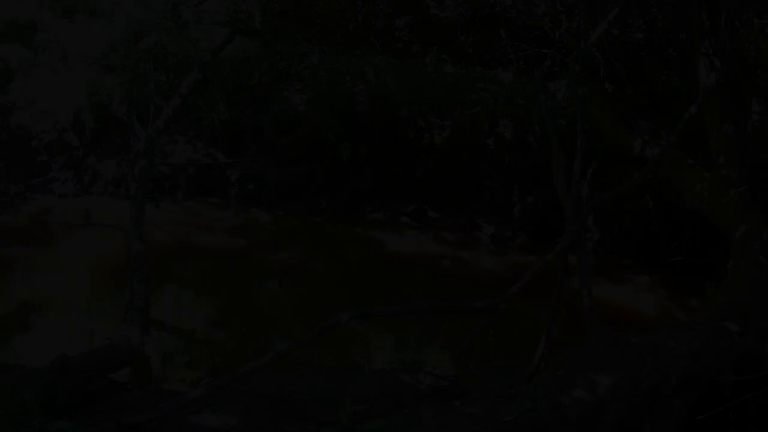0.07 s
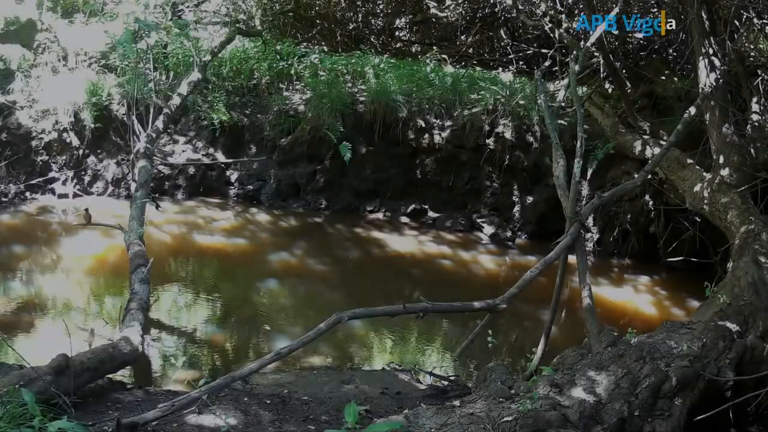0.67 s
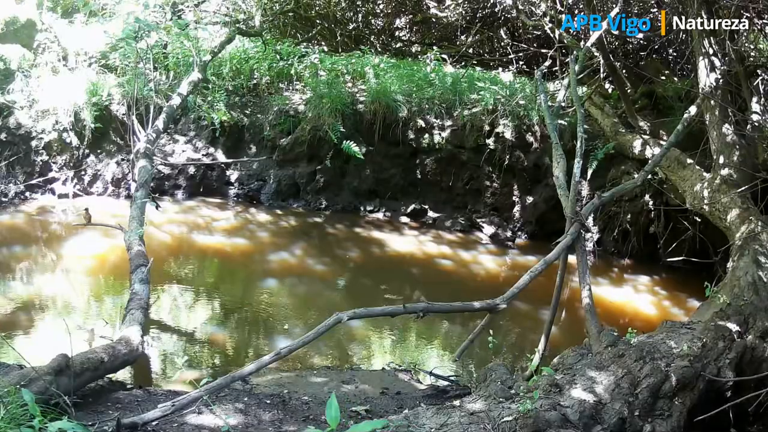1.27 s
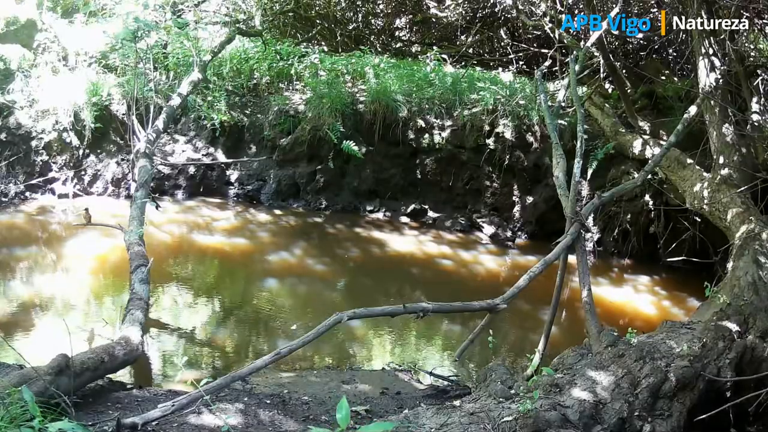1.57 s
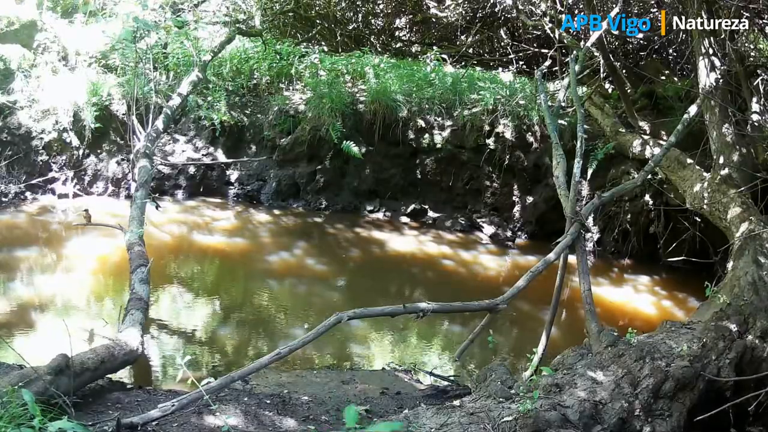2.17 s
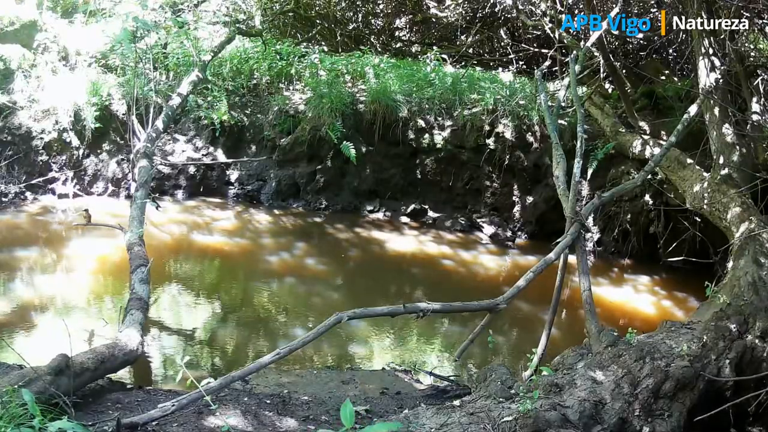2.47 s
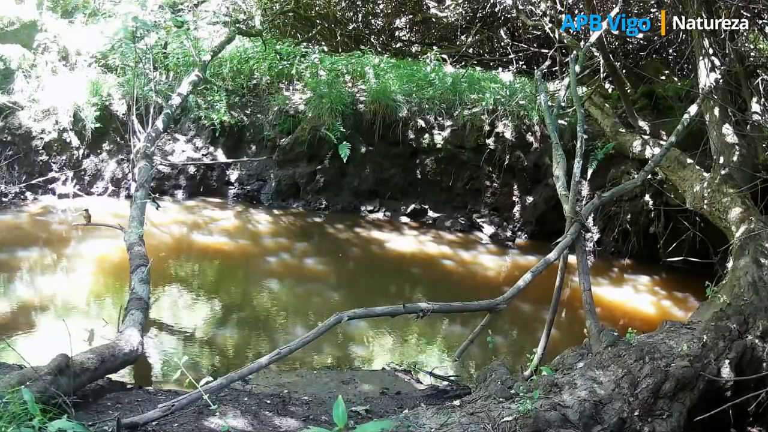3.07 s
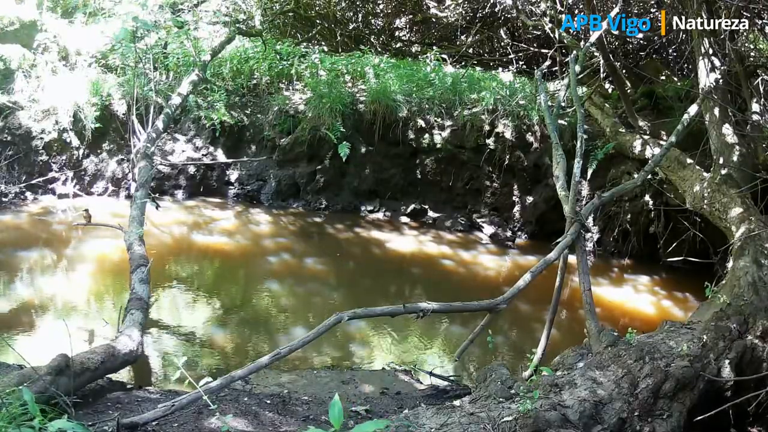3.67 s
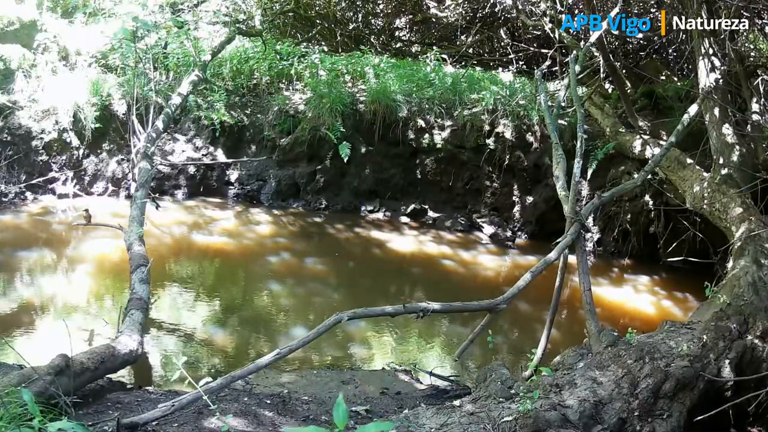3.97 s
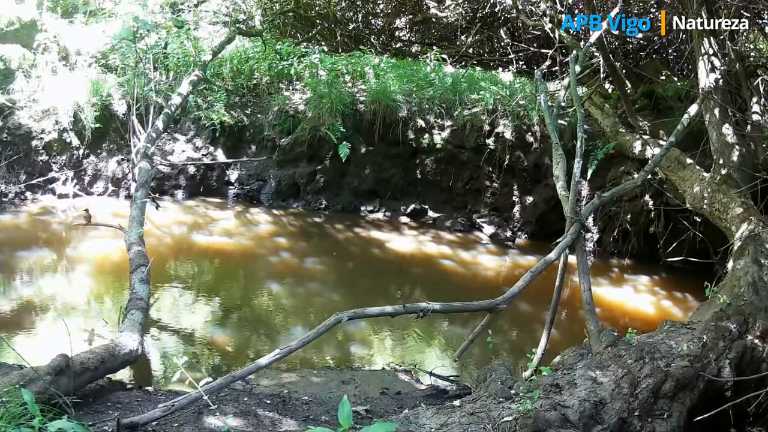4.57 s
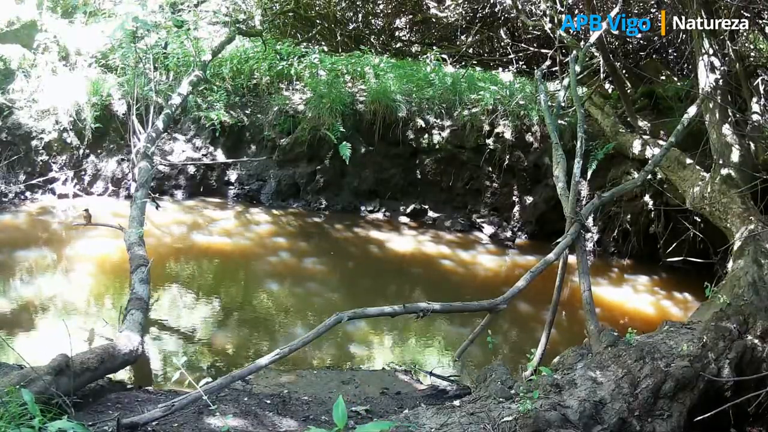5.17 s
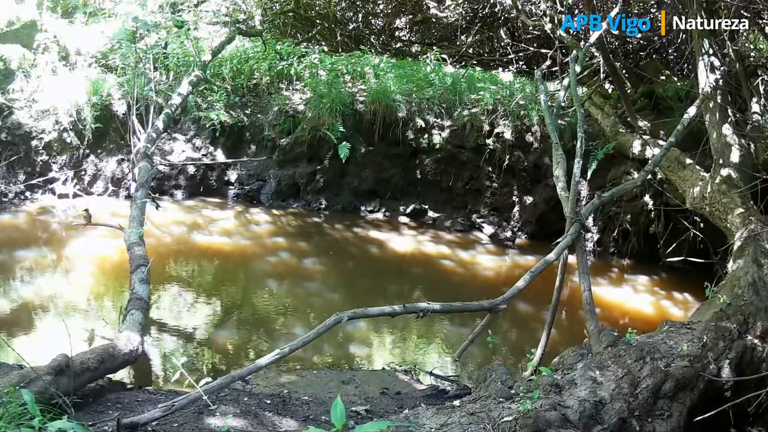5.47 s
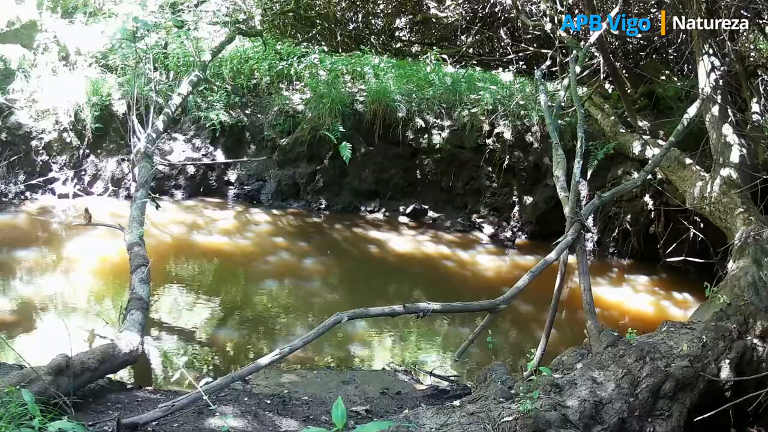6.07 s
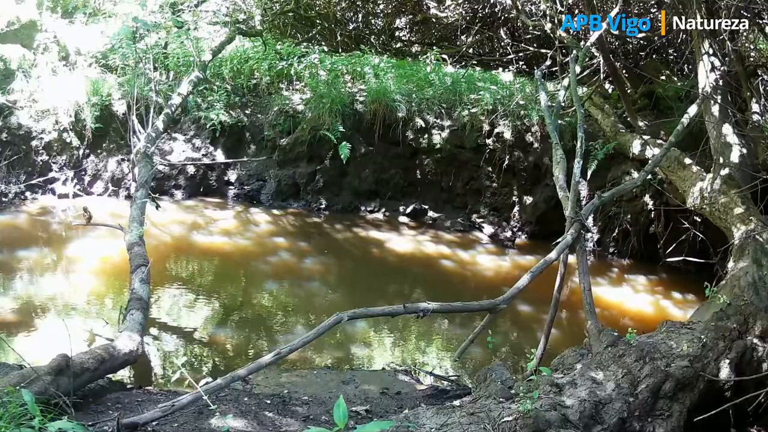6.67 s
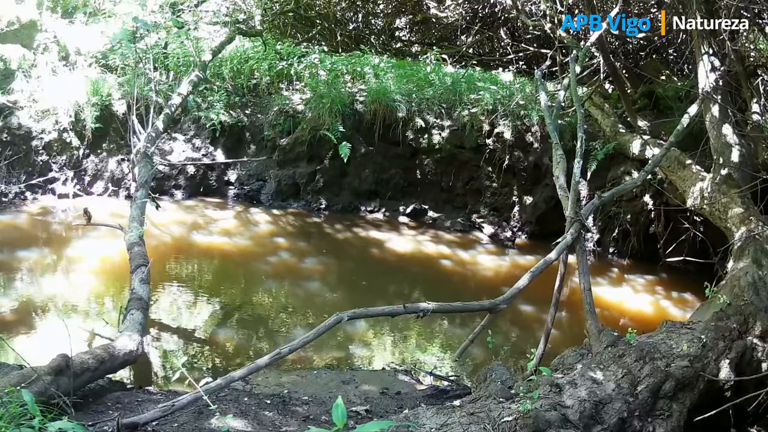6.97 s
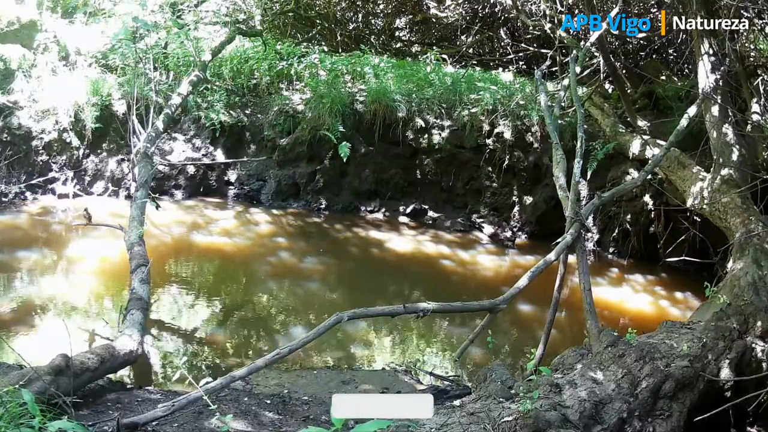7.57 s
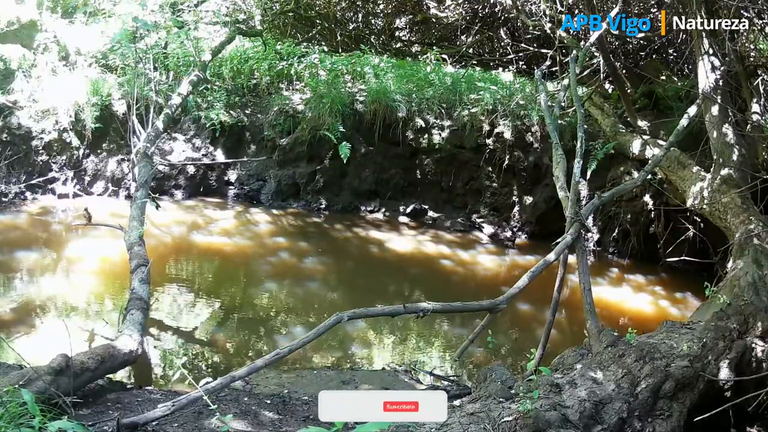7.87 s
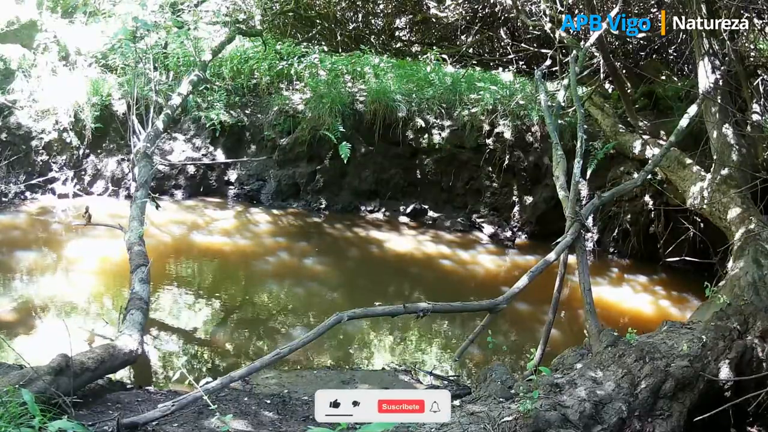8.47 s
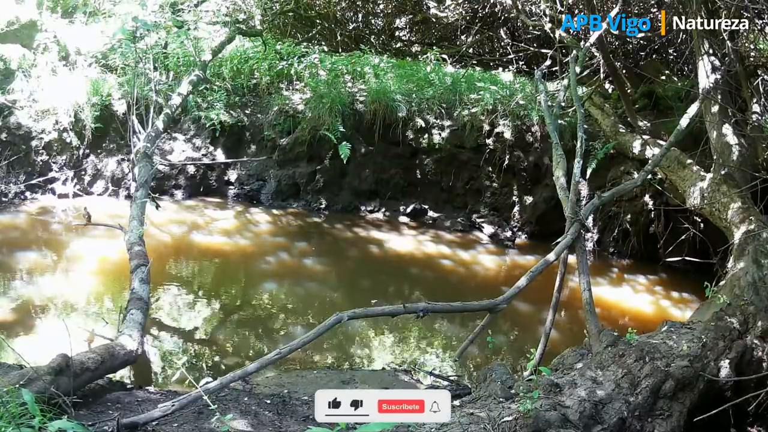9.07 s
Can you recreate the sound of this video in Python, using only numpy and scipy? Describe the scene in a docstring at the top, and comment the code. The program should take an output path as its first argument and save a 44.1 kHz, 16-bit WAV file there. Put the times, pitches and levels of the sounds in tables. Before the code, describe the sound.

Wind rumbles and puffs against the microphone while birds chirp and warble beside a quiet woodland stream.

```python
"""Four sharp bird chips, another bird's yelp and two phrases of a far warbler, by a slow stream.
The calls are gliding syrinx tones, scattered by banks and trees. Water and leaves hush, far
machinery hums, a twig ticks; moving air rumbles and its eddies buffet the microphone.
The sound fades in, on the left channel only."""
import sys
import numpy as np
from scipy import signal
from scipy.fft import rfft, irfft, next_fast_len
from scipy.io import wavfile
from scipy.ndimage import map_coordinates

SR = 44100
rng = np.random.default_rng(int(sys.argv[2]) if len(sys.argv) > 2 else 0)


def wav_record(signal):
    """Record a signal, one row per channel, as 16-bit PCM in the file named by sys.argv[1]."""
    frames = np.transpose(np.atleast_2d(signal))
    bounded = np.clip(frames, -1, 1)
    # unit amplitude maps onto the largest positive 16-bit level
    quanta = np.round(bounded * 32767).astype(np.int16)
    wavfile.write(sys.argv[1], SR, quanta)


N = 410571
TIME = np.arange(N) / SR


def amp(db):
    return 10 ** (np.asarray(db) / 20)


def unit(x):
    return x / np.sqrt(np.mean(x ** 2) + 1e-20)


def wobble(rate_hz, size=N):
    """Smooth random curve through rate_hz knots a second."""
    knots = rng.standard_normal(int(size * rate_hz / SR) + 4)
    return map_coordinates(knots, [np.arange(size) * rate_hz / SR])


def filtered(x, response):
    """Zero-phase filter with gain response(hz)."""
    size = next_fast_len(len(x) + 8192)
    return irfft(rfft(x, size) * response(np.fft.rfftfreq(size, 1 / SR)), size)[:len(x)]


def noise(spectrum):
    """Noise of rms 1, shaped by rows of (frequency [Hz], level [dB])."""
    knots_hz, db = np.transpose(spectrum)
    gain = lambda hz: amp(np.interp(np.log(hz + 1), np.log(knots_hz), db))
    return unit(filtered(rng.standard_normal(N), gain))


def rasp(size, low_hz, high_hz):
    """Band noise of rms 1."""
    band = lambda hz: 1 / (1 + (low_hz / (hz + 1)) ** 8 + (hz / high_hz) ** 12)
    return unit(filtered(rng.standard_normal(size), band))


def add(track, start_s, x):
    part = track[max(0, round(start_s * SR)):][:len(x)]
    part += x[:len(part)]


def voice(hz, harmonics_db=(0,)):
    """Harmonic tone along a pitch curve."""
    phase = 2 * np.pi * np.cumsum(hz) / SR
    return np.sqrt(2) * sum(amp(db) * np.sin(k * phase) for k, db in enumerate(harmonics_db, 1))


def woods(x, t60_s, late_db, late_t60_s):
    """Scatter from banks and trunks: a quick dense answer and a weak long tail."""
    t = np.arange(SR) / SR
    decay = amp(-60 * t / t60_s) + amp(late_db - 60 * t / late_t60_s)
    onset = 1 - np.exp(-t / 0.013)
    tail = rng.standard_normal(SR) * decay * onset
    return signal.fftconvolve(x, tail / np.linalg.norm(tail))


def chips():
    """Small bird: fast pitch arches, second harmonic dominant, over a lower, rougher second voice."""
    # (time [s], level [dB], top pitch [Hz], length [s], arch depth [share of top pitch],
    #  bank echo delay [s], wood scatter [dB], third harmonic [dB], rasp [dB])
    calls = [(1.387, -42.8, 2500, .044, .47, .027, -0.5, -10.5, -6),
             (2.749, -43, 2520, .044, .41, .041, 0.5, -12.5, -7.5),
             (3.950, -53.3, 2580, .045, .38, .018, 6, -12, -7.5),
             (4.618, -53.3, 2510, .04, .31, .033, 6.5, -18, -11)]
    # arch of one chip: (position [share of length], pitch drop [share of depth], level [dB])
    contour = [(0, 1, -11), (.15, .58, -1), (.3, .14, -1), (.5, 0, -1.3), (.7, .11, -.5), (.85, .52, -1.5),
               (1, .95, -9)]
    position, drop, contour_db = np.transpose(contour)
    out = np.zeros(N)
    for start_s, db, top_hz, length_s, depth, echo_s, scatter_db, third_db, rasp_db in calls:
        size = int(length_s * SR)
        progress = np.linspace(0, 1, size)
        arch = 1 - depth * np.interp(progress, position, drop)
        jitter = 0.003 + 0.061 * (1 - arch)  # steady on top, ragged on the flanks
        hz = top_hz * arch * (1 + jitter * wobble(900, size))
        lower_hz = 0.83 * top_hz * arch ** 0.75 * (1 + 0.06 * wobble(900, size))
        tone = voice(hz, [-11, 0]) + amp(-5.5) * voice(lower_hz, [-15, 0, -17, third_db - 9.5])
        tone += amp(rasp_db) * rasp(size, low_hz=2010, high_hz=3700)
        level_db = db + np.interp(progress, position, contour_db) + 2.3 * wobble(500, size)
        envelope = amp(level_db) * signal.windows.tukey(size, 0.1)
        third = amp(third_db + 30 * (arch - 1)) * voice(3 * hz)  # strongest at the top of the arch
        call = envelope * tone
        upper = envelope * (third + amp(-21.5) * rasp(size, low_hz=5700, high_hz=6900))
        scatter = woods(call + upper, t60_s=0.45, late_db=-21.5, late_t60_s=0.82)
        add(out, start_s, amp(-3.5) * (call + amp(-6) * upper))  # treble beams away into the trees
        add(out, start_s + echo_s, amp(-8.5) * (call + upper))  # far bank
        add(out, start_s, amp(scatter_db - 2.5) * scatter)
    return out


def yelp():
    """Second bird: a lower, raspy arch and its echo from the bank."""
    # arch of the yelp: (time [s], pitch [Hz], level [dB])
    contour = [(4.991, 1680, -59), (4.999, 1950, -52), (5.012, 2170, -52), (5.024, 2040, -50.5),
               (5.034, 1750, -56)]
    times_s, hz, db = np.transpose(contour)
    start_s = times_s[0]
    t = np.arange(start_s, times_s[-1], 1 / SR)
    pitch_hz = np.interp(t, times_s, hz) * (1 + 0.011 * wobble(500, len(t)))
    envelope = amp(np.interp(t, times_s, db) + 1.1 * wobble(900, len(t)))
    call = envelope * voice(pitch_hz, [-1, -12, -11])
    out = np.zeros(N)
    add(out, start_s, call)
    add(out, start_s + 0.038, amp(-4.5) * call)
    # foliage scatters upper harmonics and rasp most
    bright = voice(pitch_hz, [-3.5, -8, 0.5, -28]) + amp(-6) * rasp(len(t), low_hz=2600, high_hz=3700)
    add(out, start_s, woods(envelope * bright, t60_s=0.39, late_db=-23, late_t60_s=0.7))
    return out


def warbler():
    """Far warbler: two phrases of whistles and slurs, a rising sweep in each, mostly via the trees."""
    # rising sweeps: (time [s], level [dB])
    sweeps = [(1.075, -61), (7.703, -57.5)]
    # notes: (time [s], length [s], pitch [Hz], slur [octaves], level [dB])
    whistles = [(0.869, 0.065, 2200, 0.13, -63), (.96, .07, 2360, .12, -61), (1.56, 0.084, 3140, -.1, -61),
                (1.66, 0.089, 3290, -.12, -61.5), (1.737, 0.094, 2733, -.04, -52),
                (1.946, 0.063, 3000, .25, -57), (1.997, 0.079, 3255, .06, -58),
                (2.125, 0.11, 3370, .03, -60), (2.37, 0.073, 3690, .12, -64.5),
                (2.385, 0.086, 3120, -.07, -58.5), (2.504, .03, 2920, -.15, -59),
                (2.54, .06, 2700, -.04, -57.5), (7.338, 0.13, 4220, .04, -73),
                (7.591, 0.03, 2200, .03, -58.5), (8.118, 0.073, 3750, -.14, -64),
                (8.15, 0.067, 3570, -.04, -62.5), (8.219, .05, 2620, -.03, -59),
                (8.274, .07, 2810, .2, -58.5), (8.4, 0.063, 3140, -.25, -61),
                (8.447, .08, 2420, -.24, -58.3), (8.572, 0.044, 2380, 0.2, -58.5),
                (8.724, 0.031, 3360, -.12, -54), (8.76, .1, 3300, -.015, -60.5),
                (8.84, 0.1, 3860, .04, -66), (8.868, 0.025, 3150, -.16, -61),
                (8.886, 0.057, 3015, -0.03, -56), (8.9, .06, 3530, .15, -65),
                (9.054, 0.036, 3280, -0.165, -54.5), (9.088, 0.056, 2770, -.2, -59)]
    sweep_s, from_hz, to_hz, rise_s, fade_db = 0.17, 1900, 4370, 0.046, 7.5
    out = np.zeros(N)

    def sing(start_s, hz, db, quaver):
        tone = voice(hz * (1 + quaver * wobble(300, len(hz))))
        note = amp(db) * tone * signal.windows.tukey(len(hz), 0.25)
        add(out, start_s, amp(-5.5) * note)
        add(out, start_s, amp(-2) * woods(note, t60_s=0.83, late_db=-14.5, late_t60_s=1.5))

    t = np.arange(int(sweep_s * SR)) / SR
    sweep_hz = to_hz + (from_hz - to_hz) * np.exp(-t / rise_s)
    for start_s, db in sweeps:
        sing(start_s, sweep_hz, db - fade_db * t / sweep_s, quaver=0.034)
    for start_s, length_s, hz, octaves, db in whistles:
        slur_hz = hz * 2 ** (octaves * np.linspace(-0.5, 0.5, int(length_s * SR)))
        sing(start_s, slur_hz, db, quaver=0.013 + 0.072 * abs(octaves))
    return out


def puffs():
    """Wind puffs: uneven eddies push and pull on the microphone diaphragm."""
    # (peak time [s], level [dB], eddy rate [Hz], Gaussian half width [s])
    gusts = [(0.299, -11.5, 50.3, .009), (0.354, -19, 115, 0.0075), (.378, -19.5, 105, 0.0083),
             (0.455, -26.5, 136, 0.0052), (0.503, -21, 91, 0.014), (0.539, -17.5, 62, 0.013),
             (.543, -19, 215, 0.0021), (.583, -19, 93, 0.01), (.605, -15, 44, .009), (.63, -13, 72, 0.012),
             (0.819, -18, 61, 0.012), (0.853, -27, 150, 0.0098), (0.869, -16.5, 105, 0.0062),
             (0.9, -18, 50, 0.011), (0.976, -17.5, 45, 0.0075), (.99, -33, 207, 0.0044),
             (1.169, -14, 90, 0.0058), (1.178, -21.5, 39, 0.009), (1.815, -12, 35, 0.029),
             (2.541, -27, 25.3, 0.04), (3.144, -16.5, 41.1, 0.021), (3.171, -27, 120, 0.006),
             (3.481, -25.5, 31, 0.041), (4.016, -23.5, 20, 0.057), (4.19, -22.5, 31, 0.022),
             (4.463, -16, 26.3, 0.027), (4.535, -26.5, 55, 0.018), (5.113, -25, 62, 0.018),
             (5.186, -20, 69, 0.0093), (7.485, -27, 28.5, 0.034)]
    out, t = np.zeros(N), np.arange(-SR // 5, SR // 5) / SR
    for peak_s, db, eddy_hz, half_s in gusts:
        rate_hz = eddy_hz * np.exp(0.3294 * wobble(130.1, len(t)))
        swirl = np.sin(2 * np.pi * (np.cumsum(rate_hz) / SR + rng.random()))
        lowpass = lambda hz: 1 / (1 + (hz / (1.58 * eddy_hz)) ** 2.9)
        churn = unit(filtered(rng.standard_normal(len(t)), lowpass))
        envelope = amp(db) * np.exp(-0.5 * (t / half_s) ** 2)
        add(out, peak_s + t[0], envelope * (swirl + 0.53 * churn))
    return filtered(out, lambda hz: 1 / (1 + (hz / 480) ** 8))


def twig():
    """A twig gives way in dry ticks, each with a faint scatter after it."""
    # (time [s], level [dB])
    ticks = [(0.441, -59), (.691, -54), (7.2771, -47), (7.316, -60)]
    # tick spectrum: (frequency [Hz], level [dB])
    spectrum = [(800, -10), (2000, 14), (3000, 8), (4500, -10), (5500, 1), (6500, 2), (8000, 6.5),
                (9000, -31)]
    hold_s, snap_t60_s, scatter_t60_s = 0.0022, 0.015, 0.13
    envelope, t = np.zeros(N), np.arange(SR // 4) / SR
    snap = amp(-60 * np.maximum(t - hold_s, 0) / snap_t60_s)
    scatter = amp(-12 - 60 * t / scatter_t60_s)
    for start_s, db in ticks:
        add(envelope, start_s, amp(db) * (snap + scatter))
    return envelope * noise(spectrum)


def rumble():
    """Moving air: a low, uneven rumble."""
    # wind strength: (time [s], level [dB])
    wind = [(0.7, -29.5), (2.88, -37), (3.05, -33), (3.91, -36), (4.36, -29.5), (4.67, -36.5),
            (5.15, -31.5), (6.01, -36), (9.3, -37.5)]
    # moving air: (frequency [Hz], level [dB])
    spectrum = [(8, -3.5), (24, 4), (46, -3.5), (65, -5.5), (88, -12), (160, -23), (300, -41), (700, -87.5)]
    wind_db = np.interp(TIME, *np.transpose(wind))
    return amp(wind_db + 2.5 + 1.57 * wobble(8)) * noise(spectrum)


def stream():
    """Water and leaves: an even hush."""
    # hush: (frequency [Hz], level [dB])
    spectrum = [(60, -20), (150, 7.5), (260, 3), (420, -0.5), (700, -2), (1100, -8), (1700, -11),
                (2800, -14.5), (3800, -22), (4800, -30.5), (5400, -29.5), (6200, -25), (7600, -27),
                (8500, -44.5)]
    ripple_db = 0.25 * wobble(1.5) + 0.35 * wobble(12)
    return amp(-48.5 + ripple_db) * noise(spectrum)


def hum():
    """Far machinery: tones that swell, ebb and waver on their way through the air."""
    # (pitch [Hz], quiet level [dB], loud level [dB], peak time [s], rise [s], fall [s])
    tones = [(278.3, -66.5, -54.5, 6.94, 0.36, 2.4), (334.5, -72.5, -62, 1.7, 0.46, 6),
             (556.5, -73, -66, 4.6, 3, 1.3), (270.5, -80, -61.5, 6.1, .45, .6)]
    waver_hz, waver_db = 1.4, 2
    out = np.zeros(N)
    for hz, quiet_db, loud_db, peak_s, rise_s, fall_s in tones:
        width_s = np.where(TIME < peak_s, rise_s, fall_s)
        swell = np.exp(-0.5 * ((TIME - peak_s) / width_s) ** 2)
        level_db = quiet_db + (loud_db - quiet_db) * swell + waver_db * wobble(9)
        out += amp(level_db) * voice(hz + waver_hz * wobble(16))
    return out


def scene():
    """Left channel only; the sound cuts in partway up a fade."""
    open_s, fade_s, gain_db = 0.235, 0.93, 7.5
    mix = chips() + yelp() + twig() + stream() + hum() + rumble() + puffs() + warbler()
    gate = np.clip((TIME - open_s) / 0.002, 0, 1)
    fade = np.minimum(TIME / fade_s, 1) ** 1.25
    return np.array([amp(gain_db) * gate * fade * mix, np.zeros(N)])


def record(dry):
    """Recorder band limit: a steep low-pass."""
    cutoff_hz = 8850
    return np.array([filtered(x, lambda hz: 1 / np.sqrt(1 + (hz / cutoff_hz) ** 120)) for x in dry])


dry = scene()
out = record(dry)
wav_record(out)
```